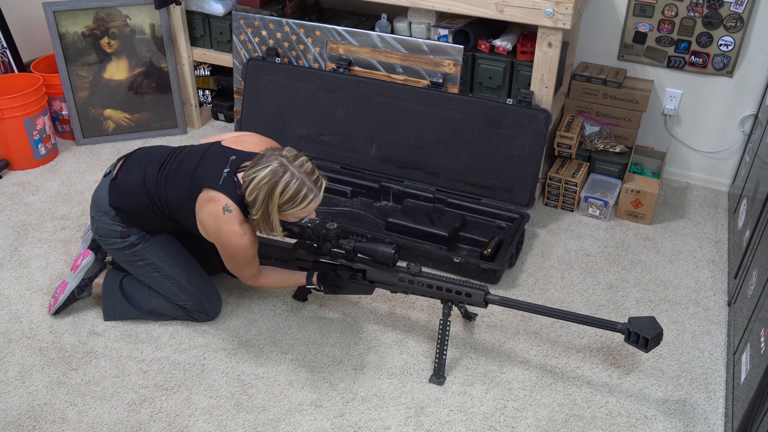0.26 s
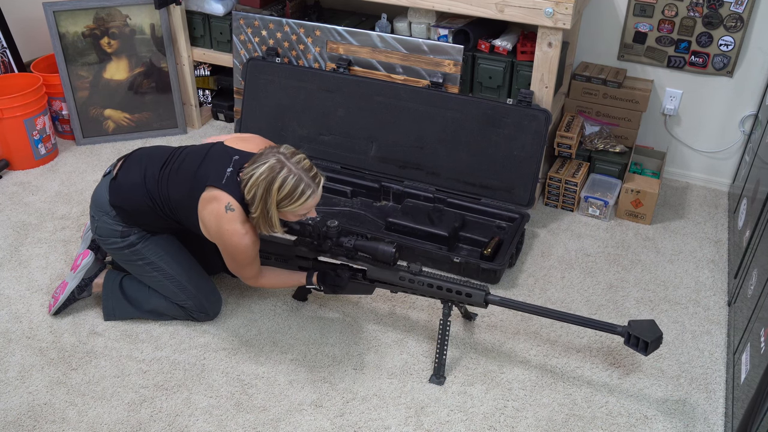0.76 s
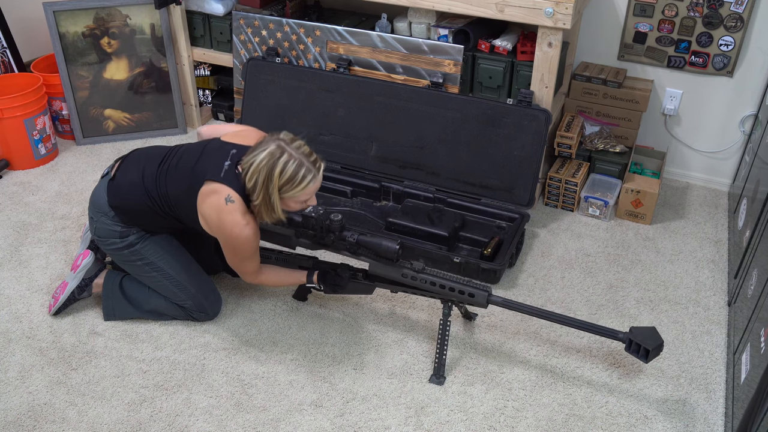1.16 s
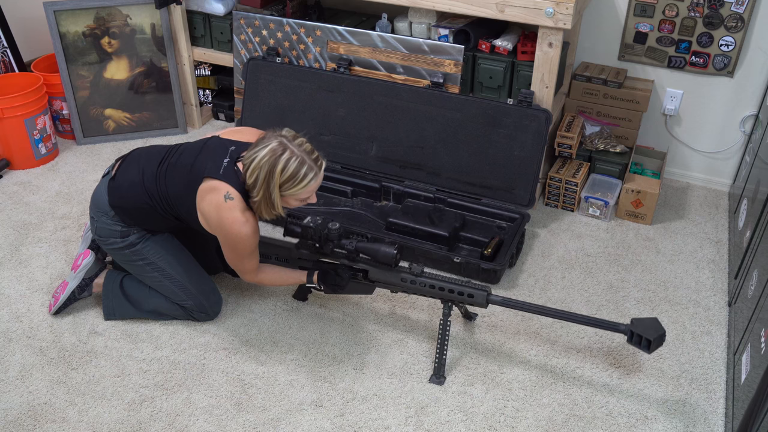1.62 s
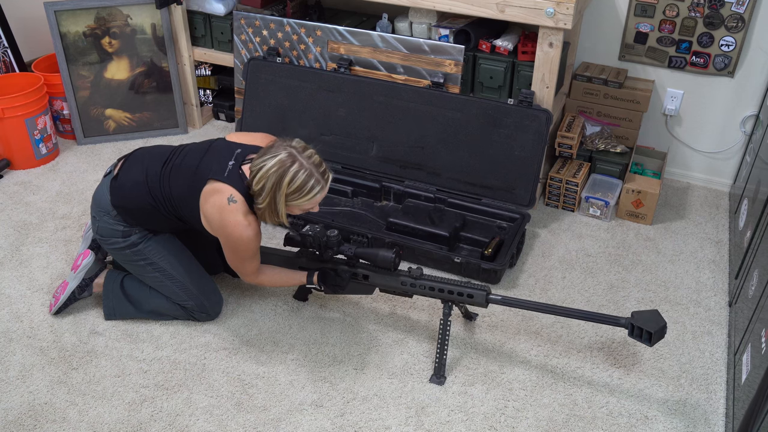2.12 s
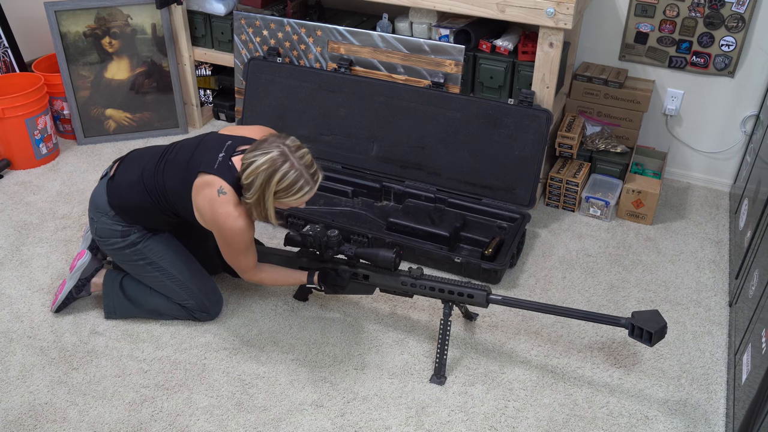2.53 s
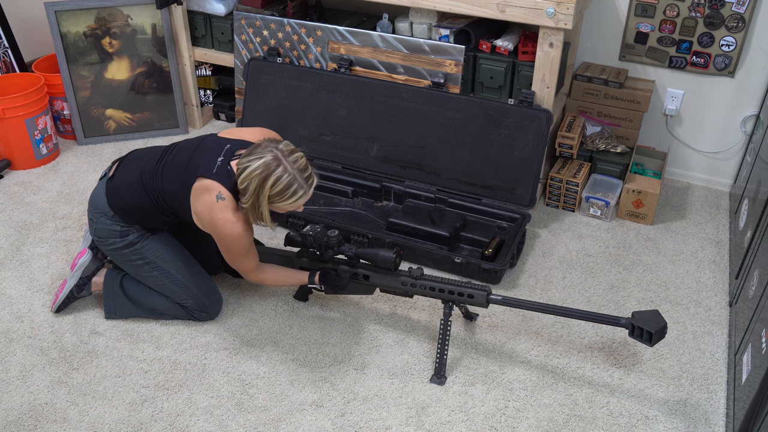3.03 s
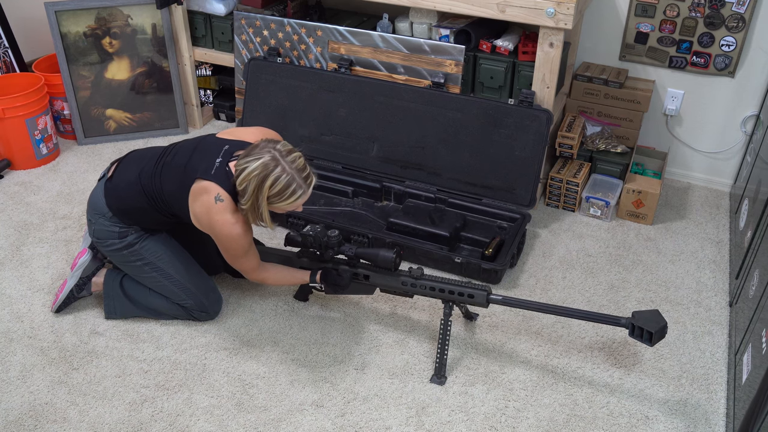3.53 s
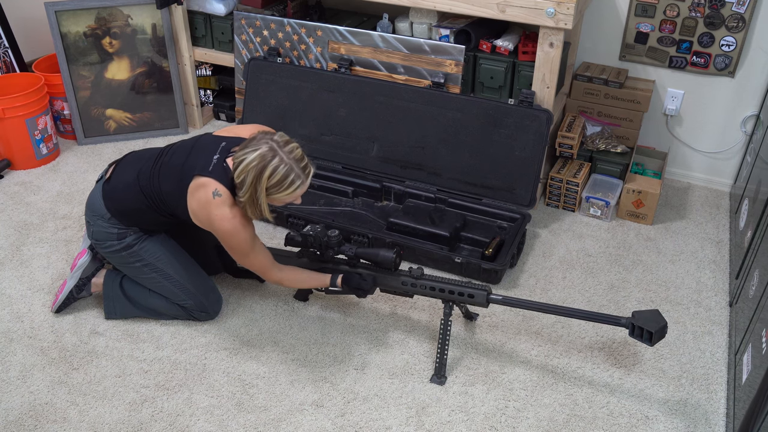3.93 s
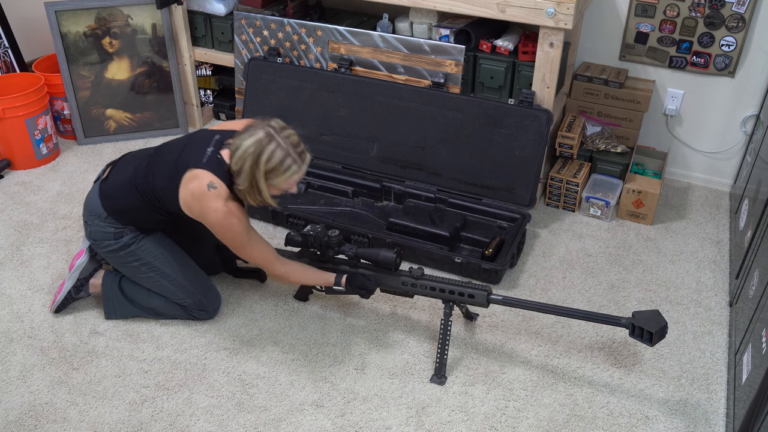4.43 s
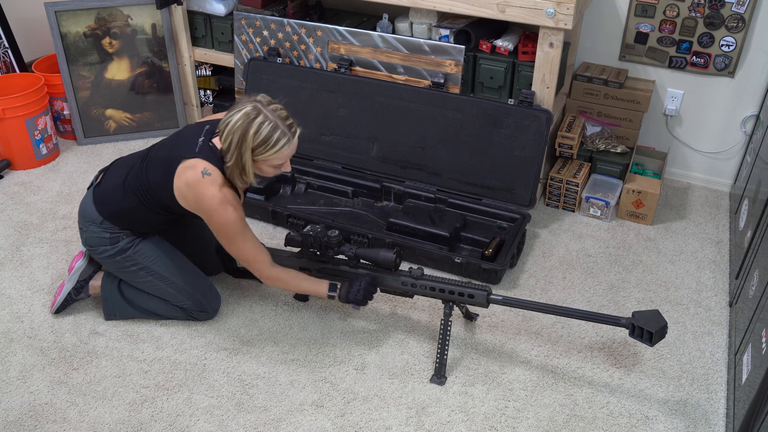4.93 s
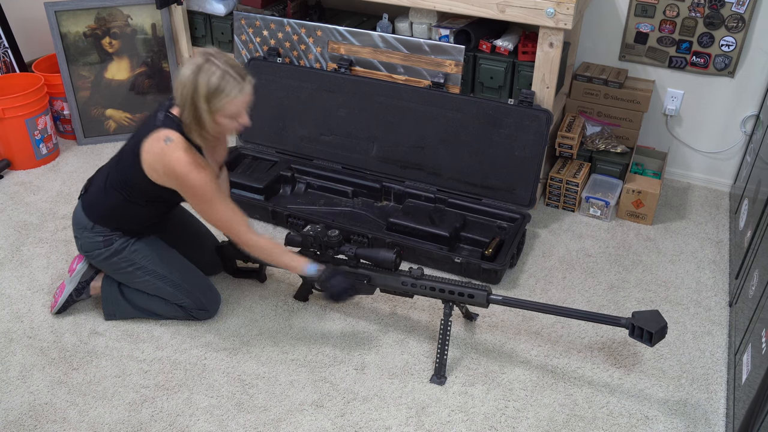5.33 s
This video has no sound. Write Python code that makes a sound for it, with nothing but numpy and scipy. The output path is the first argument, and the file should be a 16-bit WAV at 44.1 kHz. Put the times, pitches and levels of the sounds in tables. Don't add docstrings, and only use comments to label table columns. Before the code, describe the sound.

A large rifle's bolt is worked in a small, hard-walled room with carpet, heard by a distant stereo microphone over constant broadband hiss and a barely perceptible hum. A gloved handling knock and cloth rustle open the scene, with fainter taps at 0.65 and 0.97 seconds. Around 1.17 seconds the latch unlocks with a short cluster of dull knocks and a brief scrape, followed by tiny loose rattles and a faint slide. From 1.77 to 1.9 seconds the bolt strikes its stops in five hard, rapid steel clacks with short reverberation. Soft settling ticks follow until 2.4, then mostly hiss, with barely audible taps at 3.1 and 3.5. At 3.85 to 3.95 clacks and a rail scrape lead into the slam, bright and shimmering, its thin barrel ring fading over a second or more. The hiss ducks, creeps back, and steps up near 5.3 with a light tap.

```python
import sys
import numpy as np
from scipy import signal
from scipy.fft import rfft
from scipy.io import wavfile
from scipy.ndimage import uniform_filter1d

SR = 44100
rng = np.random.default_rng(int(sys.argv[2]) if len(sys.argv) > 2 else 0)


def generate_wav(signal):
    frames = np.transpose(np.atleast_2d(signal))
    scaled = np.clip(frames, -1, 1) * 32767
    pcm = np.round(scaled).astype(np.int16)
    wavfile.write(sys.argv[1], SR, pcm)


def invert_db(x):
    u = np.asarray(x, float) / 20
    return 10 ** u


N = 245362
LEAD = 2000
EDGES_HZ = 40 * 2 ** np.arange(0, 9.1, 1 / 3)

# f/Hz, spectral level/dB per Hz
HISS_SPECTRUM = [(24, -67), (40, -38), (114, -19.5), (175, -19.5), (335, -13.5), (410, -11), (526, -7.5),
                 (912, -7.5), (1200, -9), (2190, -8.5), (2610, -11.5), (2960, -10.5), (5390, -15.5),
                 (15800, -16.5)]
# f/Hz, side minus mid level/dB
HISS_WIDTH = [(60, -10.5), (110, -8.5), (200, -1.5), (380, -2), (700, 3.5), (1290, 1), (2380, -1),
              (4400, -1.5), (8120, -1.5), (15000, -4)]
# start t/s, loudest t/s, end t/s, level/dB re hiss
RUSTLES = [(-.2, .001, 0.68, 11), (0, .42, 2.7, -2), (0.6, 1.83, 3, 4), (2.37, 2.42, 3, 0),
           (5.5, 5.4, 8.5, -3)]
# t/s, level/dB, release t/s
GAIN_SAGS = [
    (1.95, -4.5, 2.385),
    (3.96, -15, 5.295),
]
# f/Hz, rms level/dB
HUM_TONES = [(118.4, -101)]
HISS_DB, SAG_RELEASE_S = -65, 0.81
SWELL_POWER = 3.0

# f/Hz, T60/s
ROOM_DECAY = [(150, 0.29), (400, 0.48), (1000, 0.64), (2700, 0.55), (7000, 0.43), (14000, 0.24)]
# f/Hz, side minus mid level/dB
ROOM_WIDTH = [(60, -22), (110, -18.5), (200, -18.5), (380, -16.5), (700, -9.5), (1290, -8), (2380, -3.5),
              (4400, -4), (8120, -0.5), (15000, -7)]
ROOM_DB, ROOM_BUILD_S = -15, 0.002
EARLY_DB, EARLY_S = 4, 0.022
PAN_DB = -1.03

# t/s, peak level/dB, weight level/dB (thud, low part), edge level/dB (bright part)
HAND_TAPS = [(-.012, -31, 1.5, -2), (0.6452, -46.5, 1.5, -4.5), (0.968, -51, -0.5, 2),
             (3.1194, -67, 0, 3.5), (3.519, -58, -6, -2.5), (4.9526, -63.5, 2.5, 4),
             (5.2963, -48, 2.5, 1.5)]
LATCH_KNOCKS = [(1.1655, -35, -1.5, -1.5), (1.175, -26, 3.5, -3.5), (1.183, -38.5, 0, 2.5),
                (1.2024, -38, -0.5, 10.5)]
LOOSE_RATTLES = [(1.2614, -61, 0, 0), (1.3882, -51.5, 14, -13), (1.4444, -50, -7, 6),
                 (2.2154, -46.5, 7.5, -14), (2.342, -52, 1.5, -4), (2.4194, -55.5, 1, 7),
                 (4.322, -56.5, -4, 16)]
STEEL_BLOWS = [(1.7716, -9.5, -16, -3), (1.7897, -24, -6.5, -6.5), (1.8251, -12.5, 2.5, 4),
               (1.8541, -11, 7.5, -5.5), (1.8941, -18, 6.5, 0.5), (3.8479, -34.5, 1.5, 6),
               (3.901, -32.5, 0.5, 3.5), (3.908, -16.5, -10, -7.5), (3.927, -14.5, -16.5, 3.5)]
# peak, thud, low part, bright part, shell ring level/dB
SLAM_KNOCK = (-5, 0, -15, 8, -30.5)
# thud, low part, bright part, shell ring level/dB
TAP_COLOUR, LATCH_COLOUR = (11, 1, 0.5, 1.5), (12, 3, -4, -1.5)
RATTLE_COLOUR, BLOW_COLOUR = (4, -11, -4.5, 7), (0, -3.5, 1.5, 4.5)
RATTLE_S = 0.0035
# start t/s, hardest t/s, end t/s, level/dB
STROKES = [(.2, .6, 1.03, -85.5), (1.06, 1.165, 1.25, -60), (1.27, 1.45, 1.59, -74), (1.6, 1.74, 1.8, -76),
           (3.42, 3.51, 3.2, -86), (3.76, 3.845, 3.87, -80), (3.85, 3.951, 3.97, -40.5)]
# f/Hz, spectral level/dB per Hz
CLATTER_SPECTRUM = [(60, -46), (110, -36.5), (200, -25.5), (340, -11), (560, -21), (900, -10), (1400, -10),
                    (2000, 1.5), (2600, -4), (3300, -5.5), (4400, -8), (6500, -14.5), (10000, -16.5),
                    (15500, -21.5)]

# f/Hz, level/dB, T60/s
RECEIVER_MODES = [(764, -23.5, 0.02), (1130, -14, 0.018), (1383, -21, 0.0045), (1555, -1, 0.11),
                  (1510, -9, 0.34), (1780, -9, 0.027), (1814, -1, 0.056), (1986, 6, .03), (2186, -4, 0.07),
                  (2868, -16, 0.02), (3385, 2, .035), (3560, -7.5, 0.037)]
# f/Hz, level/dB re knock, T60/s
GRIP_MODES = [(788, -19, .03), (1774, -10.5, .027), (2024, -15, 0.022), (7666, -23, 0.0049)]
# f/Hz, level/dB re knock, T60/s
LATCH_MODES = [(354, -36.5, .04), (1920, -16.5, .023)]
# t/s, level/dB, f/Hz, T60/s
PINGS = [(0.6447, -61, 1880, .015), (1.121, -58, 3340, .012), (1.26, -60.5, 1510, 0.2),
         (1.33, -62.5, 3140, 0.067), (1.4, -64, 2670, .08), (1.42, -62, 1917, .08),
         (1.826, -32, 3150, .015), (3.518, -58.5, 1806, .03), (3.522, -62.5, 1567, .04),
         (3.848, -55, 5400, .01), (3.848, -56.5, 8090, .01), (3.915, -34, 774, .03), (5.3, -67, 2606, .04),
         (5.301, -65.5, 1617, .04)]

# t/s, level/dB, T60/s, low f/Hz, high f/Hz
HAZES = [(1.83, -41, 1.3, 1450, 1950), (3.9555, -52, 2.1, 1300, 2300), (3.9555, -47, 1.9, 1950, 2150),
         (3.9555, -45, 1.0, 4150, 4500), (3.9555, -49, 1.0, 2900, 3500), (3.9555, -24, .15, 8500, 13500)]
CARRIER_HZ = [1975, 2040, 2105, 3101, 3714, 3919, 4264, 4479, 5922, 6907, 7079, 7316, 8107, 8376, 9275,
              9825, 10131, 10487, 10729, 11294, 11391, 11843, 12823, 12980, 13130, 13300, 13534, 14570,
              14869]
CARRIER_DB = [-46, -43.5, -48, -57, -59, -45, -47, -52, -50, -44, -45.5, -41, -47, -38, -45, -39, -51, -39,
              -36, -41, -44, -52, -49, -46, -47, -54, -60, -50, -46]
# f/Hz, T60/s
CARRIER_T60 = [(2000, 0.36), (4500, 0.2), (8400, 0.25), (10000, .2), (11300, 0.24), (13000, 0.1),
               (14500, 0.05), (14900, .12)]
# f/Hz, level/dB
BARREL_MODES = [(931.3, -83), (1120, -78), (1464, -69), (1771, -70), (1976, -70), (2090, -67), (2175, -69),
                (2466, -87), (2929, -84), (3095, -83), (3316, -83), (3618, -84), (4037, -84), (4215, -75)]
BARREL_DB, BARREL_T60_S = 17.0, 2.3
TWIN_SHARE, TWIN_DB = 0.004, -2.0
SLAM_S, BLOW_DB = 3.9555, 27.5
STRAIGHT_DB = 6.5

DUCK_S, DUCK_DB, DUCK_RELEASE_S = 3.9525, -24.5, 0.063
TOP_HZ = 16400


def at_hz(points, hz):
    points = np.array(points)
    return np.interp(np.log(hz), np.log(points[:, 0]), points[:, 1])


def bands():
    return [(np.sqrt(low * high), signal.butter(2, [low, high], "band", fs=SR, output="sos"))
            for low, high in zip(EDGES_HZ, EDGES_HZ[1:])]


def stereo_pair(white, side, hz):
    return white[0] + invert_db(at_hz(side, hz)) * white[1] * [[1], [-1]]


def swell(rows):
    t = np.arange(N) / SR
    return sum(invert_db(db) * np.interp(t, [start, top, end], [0, 1, 0]) ** SWELL_POWER
               for start, top, end, db in rows)


def slow_gain():
    t = np.arange(N) / SR
    return invert_db(sum(db * (t > s) * (t < end) * np.exp(-np.abs(t - s) / SAG_RELEASE_S)
                   for s, db, end in GAIN_SAGS))


def hiss():
    white = rng.standard_normal((2, 2, N))
    out = 0
    for k, (hz, sos) in enumerate(bands()):
        pair = stereo_pair(white[k % 2], HISS_WIDTH, hz)
        out = out + invert_db(at_hz(HISS_SPECTRUM, hz)) * signal.sosfilt(sos, pair)
    out = out / np.sqrt(np.mean(out.mean(0) ** 2))
    return invert_db(HISS_DB) * slow_gain() * np.sqrt(1 + swell(RUSTLES) ** 2) * out


def hum():
    t = np.arange(N) / SR
    return sum(invert_db(db + 1.5) * np.sin(2 * np.pi * hz * t) for hz, db in HUM_TONES)


def room_bands():
    t = np.arange(SR) / SR
    white = rng.standard_normal((2, 2, SR))
    lumps_db = rng.standard_normal(SR // 50).repeat(50)
    white *= invert_db(lumps_db * np.exp(-t / 0.18))
    answers = []
    for k, (hz, sos) in enumerate(bands()):
        decay_db = ROOM_DB + EARLY_DB * np.exp(-t / EARLY_S) - 60 * t / at_hz(ROOM_DECAY, hz)
        dying = invert_db(decay_db) * (1 - np.exp(-t / ROOM_BUILD_S))
        answer = stereo_pair(white[k % 2], ROOM_WIDTH, hz) * dying
        answer[:, 0] += (-1) ** k
        answers.append(signal.sosfilt(sos, answer))
    return np.array(answers)


def through(x, answer):
    return signal.fftconvolve(x[None], answer, axes=1)[:, len(x) - N:len(x)]


def knocks():
    kinds = [(HAND_TAPS, TAP_COLOUR), (LATCH_KNOCKS, LATCH_COLOUR),
             (LOOSE_RATTLES, RATTLE_COLOUR), (STEEL_BLOWS, BLOW_COLOUR)]
    return sorted((s, db, thud_db + weight_db, low_db + weight_db, bright_db + edge_db, ring_db)
                  for rows, (thud_db, low_db, bright_db, ring_db) in kinds
                  for s, db, weight_db, edge_db in rows)


def grains(count, spread_db):
    return invert_db(spread_db * np.minimum(rng.exponential(1, count), 4)) * rng.choice([-1, 1], count)


def contacts():
    trains, t = np.zeros((5, N + LEAD)), np.arange(3000) / SR
    for s, db, thud_db, low_db, bright_db, ring_db in knocks() + [(SLAM_S, *SLAM_KNOCK)]:
        landed = rng.random(len(t)) < 1500.0 / SR
        burst = grains(len(t), spread_db=3.5) * landed * np.exp(-t / RATTLE_S)
        burst[0] = 2.5
        burst = burst / np.sqrt(np.sum(burst ** 2))
        at = round(s * SR) + LEAD
        parts_db = db + np.array([[thud_db], [low_db], [0], [bright_db], [ring_db]])
        trains[:, at:at + len(t)] += invert_db(parts_db) * burst
    grit = grains(N, spread_db=4.0) * (rng.random(N) < 4000.0 / SR)
    scrape = np.pad(grit * swell(STROKES), (LEAD, 0))
    return trains + scrape * invert_db([[-12.0], [-6.0], [0], [-3.0], [3.0]])


def clatter(trains, room):
    hz = np.array([hz for hz, sos in bands()])
    part = np.searchsorted([300, 950, 4500], hz)
    coloured = room * invert_db(at_hz(CLATTER_SPECTRUM, hz) + 17.0)[:, None, None]
    return sum(through(trains[k], coloured[part == k].sum(0)) for k in range(4))


def ring(clicks, hz, t60):
    r, w = invert_db(-60 / (t60 * SR)), 2 * np.pi * hz / SR
    return signal.lfilter([0, np.sin(w)], [1, -2 * r * np.cos(w), r * r], clicks + 1e-18)


def ticks():
    out = np.zeros(N + LEAD)
    struck = [(s, db + mode_db + weight_db * (hz < 950) + edge_db * (hz > 4500), hz, t60)
              for rows, modes in [(HAND_TAPS, GRIP_MODES), (LATCH_KNOCKS, LATCH_MODES)]
              for s, db, weight_db, edge_db in rows for hz, mode_db, t60 in modes]
    for s, db, hz, t60 in PINGS + struck:
        at = round(s * SR) + LEAD
        out[at:at + 8000] += invert_db(db) * ring(signal.unit_impulse(8000), hz, t60)
    return out


def receiver(clicks):
    out = 0
    for hz, level_db, t60 in RECEIVER_MODES:
        place_db = 2 * rng.standard_normal(N // 2000 + 1).repeat(2000)[:N]
        place_db = place_db.take(np.arange(-LEAD, N), mode="clip")
        out = out + ring(clicks * invert_db(level_db + place_db - 32.0), hz, t60)
    return out


def haze():
    out = 0
    for s, db, t60, low_hz, high_hz in HAZES:
        since = np.arange(N) / SR - s
        crowd = rng.standard_normal(N) * (since > 0) * invert_db(db - 60 * np.abs(since) / t60)
        sos = signal.butter(2, [low_hz, high_hz], "band", fs=SR, output="sos")
        out = out + signal.sosfilt(sos, crowd + 1e-18)
    return out


def slam(room):
    at = round(SLAM_S * SR)
    blow = signal.unit_impulse(N - at)
    twins = 1 + TWIN_SHARE * rng.uniform(0.24, 1, len(CARRIER_HZ)) * rng.choice([-1, 1], len(CARRIER_HZ))
    rings = []
    for hz, db, twin in zip(CARRIER_HZ, CARRIER_DB, twins):
        t60 = at_hz(CARRIER_T60, hz)
        beating = ring(blow, hz, t60) + invert_db(TWIN_DB) * ring(blow, hz * twin, t60)
        rings.append(invert_db(db + BLOW_DB) * beating)
    rings += [invert_db(db + BARREL_DB) * ring(blow, hz, BARREL_T60_S) for hz, db in BARREL_MODES]
    room_gain = np.sqrt(uniform_filter1d(np.mean(np.abs(rfft(room)) ** 2, axis=0), size=9))
    all_hz = CARRIER_HZ + [hz for hz, db in BARREL_MODES]
    into_room = sum(x / room_gain[round(hz)] for x, hz in zip(rings, all_hz))
    sides = np.array([rng.choice([-1, 1], len(rings)), np.ones(len(rings))])
    no_bass = signal.butter(2, 600, "high", fs=SR, output="sos")
    straight = signal.sosfilt(no_bass, sides @ np.array(rings))
    reverberant = through(np.pad(into_room, (at, 0)) + haze(), room)
    return reverberant + invert_db(STRAIGHT_DB) * np.pad(straight, ((0, 0), (at, 0)))


def scene():
    room, trains = room_bands(), contacts()
    above_bass = room[9:].sum(0)
    small_parts = through(receiver(trains[4]) + ticks(), above_bass)
    rifle = clatter(trains, room) + small_parts + slam(above_bass)
    return (rifle + hiss()) * invert_db([[PAN_DB / 2], [-PAN_DB / 2]]) + hum()


def low_pass(x):
    return signal.sosfilt(signal.butter(12, 16090, fs=SR, output="sos"), x)


def record(dry):
    cut = signal.sosfilt(signal.cheby2(12, 60, TOP_HZ, fs=SR, output="sos"), dry)
    since = np.arange(N) / SR - DUCK_S
    duck_db = DUCK_DB * np.clip(since / 0.002, 0, 1) * np.exp(-np.maximum(since, 0) / DUCK_RELEASE_S)
    return low_pass(cut * invert_db(duck_db))


dry = scene()
out = record(dry)
generate_wav(out)
```